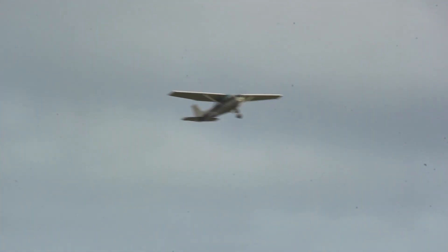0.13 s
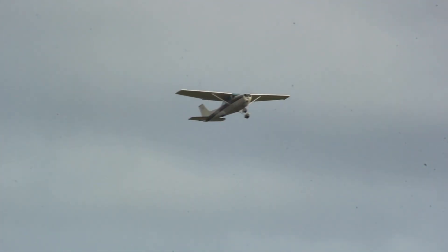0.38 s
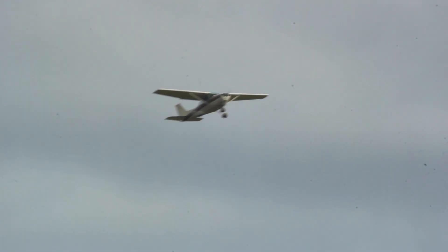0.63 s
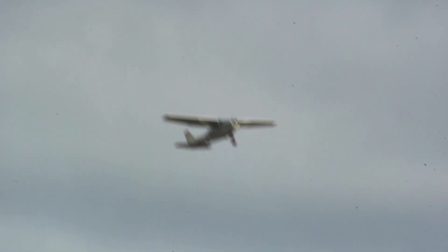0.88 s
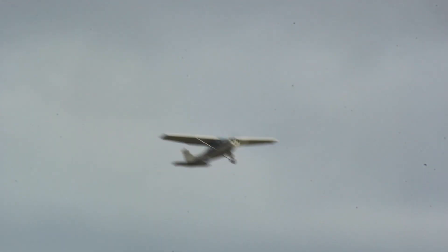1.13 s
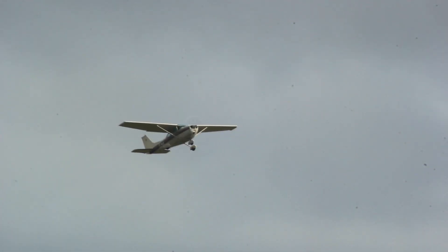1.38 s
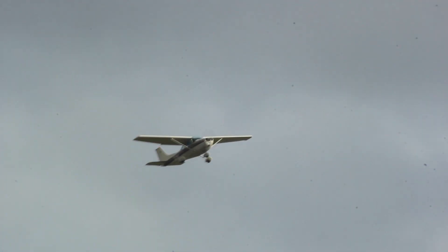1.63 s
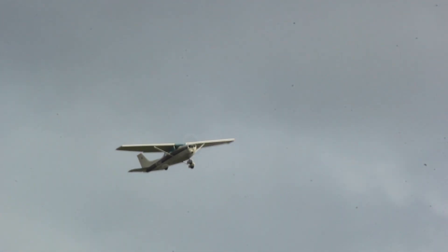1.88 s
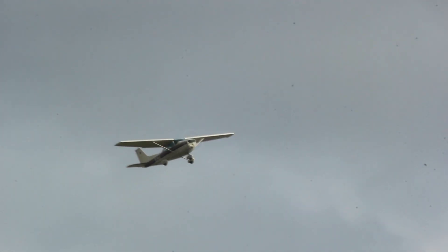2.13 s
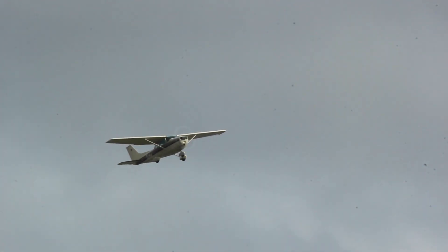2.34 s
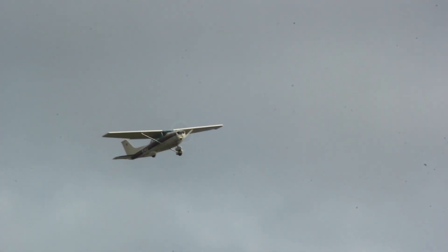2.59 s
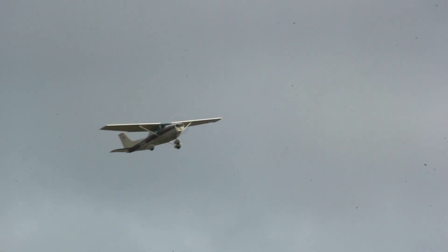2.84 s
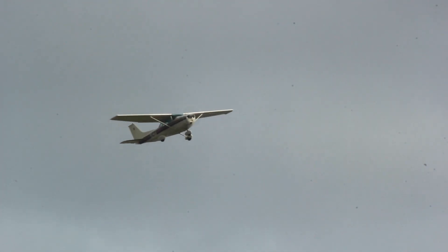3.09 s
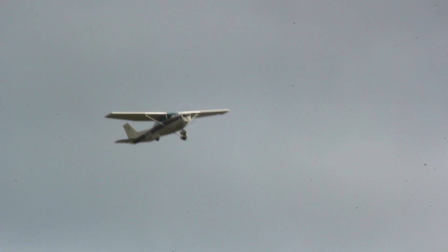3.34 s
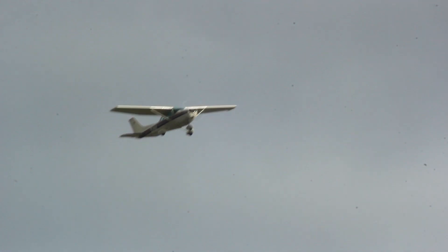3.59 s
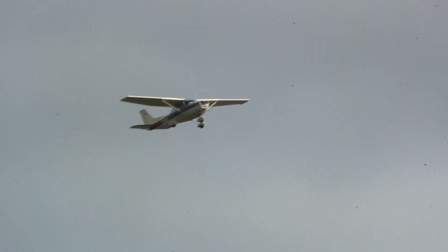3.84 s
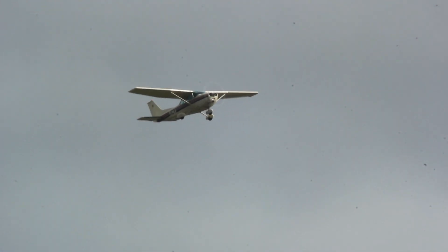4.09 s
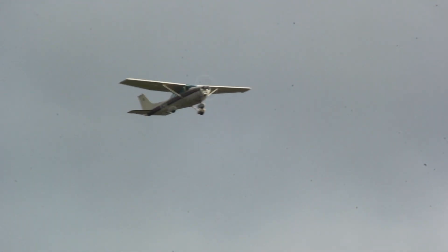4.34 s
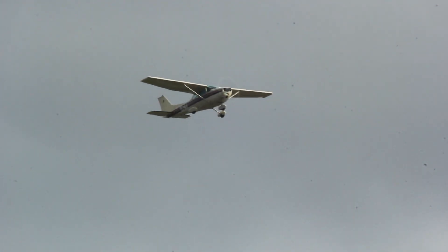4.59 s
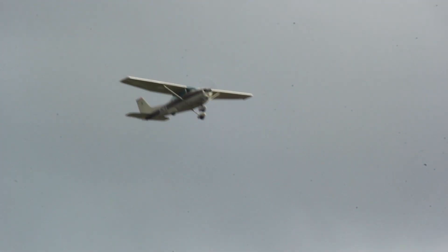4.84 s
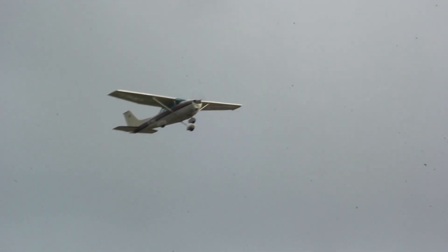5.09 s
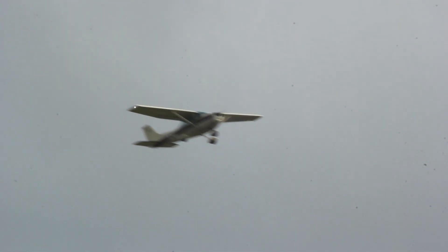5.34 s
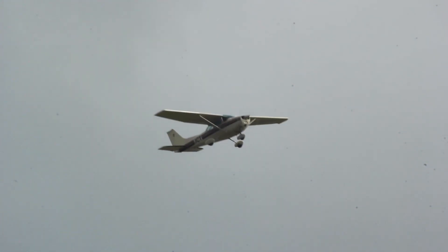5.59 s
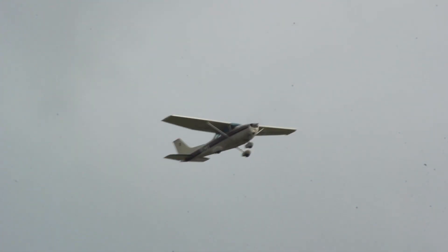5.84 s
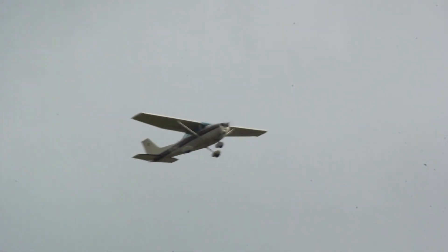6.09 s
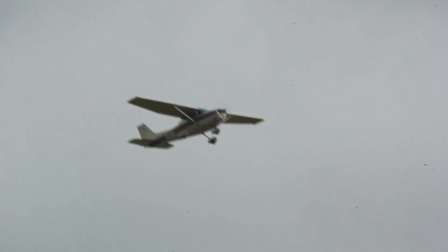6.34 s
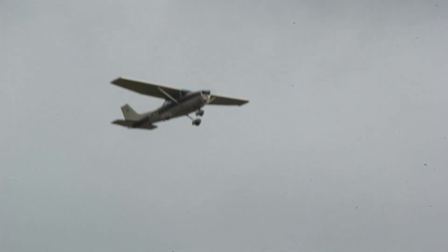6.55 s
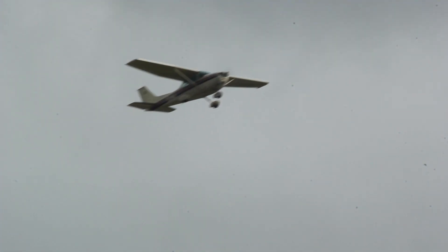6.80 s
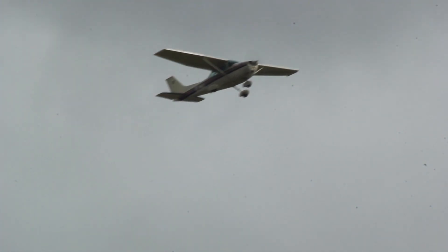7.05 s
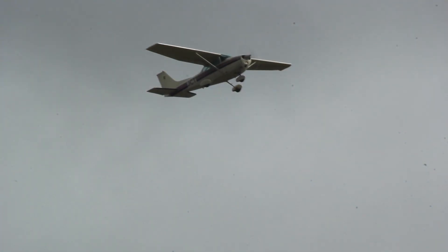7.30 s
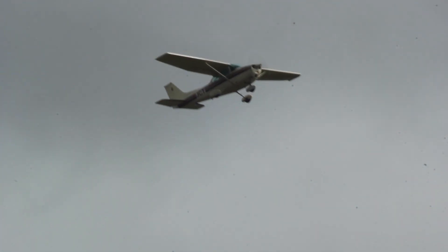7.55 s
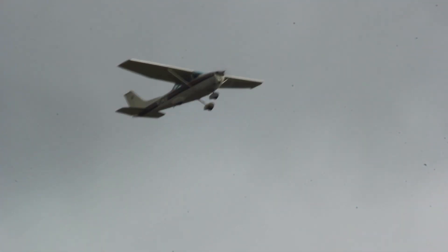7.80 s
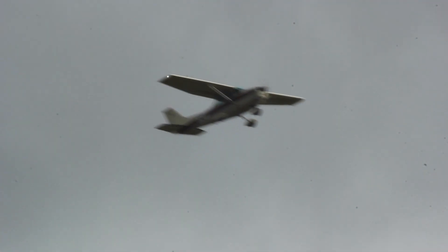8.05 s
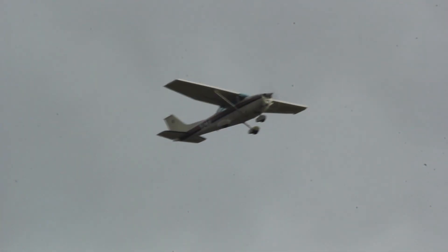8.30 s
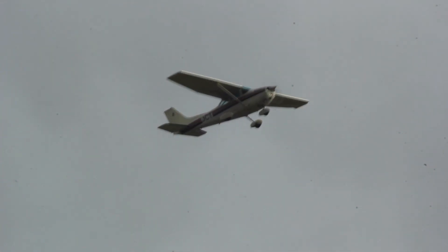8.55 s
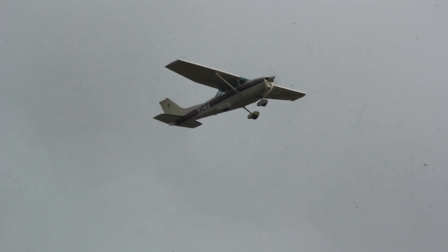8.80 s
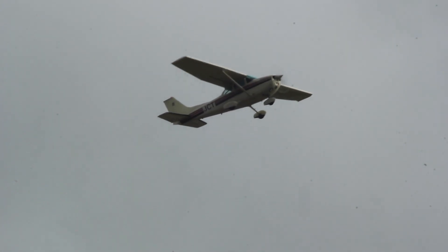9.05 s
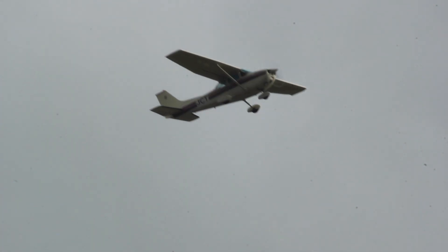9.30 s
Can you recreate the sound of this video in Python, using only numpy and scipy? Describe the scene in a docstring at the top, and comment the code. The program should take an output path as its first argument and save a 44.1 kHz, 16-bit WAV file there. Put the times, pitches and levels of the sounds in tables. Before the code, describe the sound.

A light propeller plane is already droning at the start and continues for about 9.4 seconds. Its low, nearly constant pitch, around 87 pulses per second, carries a throaty bark, gritty rasp and wavering propeller hum. The engine swells unevenly, with a strong, brighter surge near 3 seconds, weakens around 5.3 to 6.2, then returns in patches, including bursts near 8.7 and 9.1. Outdoor wind rumbles against the bare microphone throughout, with a dull rush in gusts. Short thumps come in the first five seconds; the heaviest, distorted blows hit around 5.2 to 5.7 and 7.2 to 7.9. Small dry ticks occur near 2.3, 3.0, 4.7 and later. Very faint, high descending bird peeps appear around 6.1 to 7.7 and 8.6 to 9. Thin hiss lies underneath; the drone and wind stop abruptly.

```python
"""Light propeller plane in strong wind

A four-cylinder engine drones: each firing passes a pulse of coloured noise and a short rattle.
The propeller adds sine tones locked to the firing rate, which waver in level and phase.
Wind is low noise that swells in gusts and thumps, with a brighter rush, driven into clipping.
A faint hiss lies beneath; damped rings make small ticks, and gliding sines a faint bird."""
import sys
import numpy as np
from scipy import signal
from scipy.io import wavfile
from scipy.ndimage import uniform_filter1d

SR = 44100
rng = np.random.default_rng(int(sys.argv[2]) if len(sys.argv) > 2 else 0)


def how_loud(loudness_db):
    """Turn decibels into a plain amplitude multiplier (0 dB gives 1, 20 dB gives 10)."""
    steps = np.asarray(loudness_db, float) / 20
    return 10 ** steps


def file_out(sig):
    """Save sig as 16-bit WAV at sys.argv[1]."""
    # one column per channel
    cols = np.atleast_2d(sig).T
    # limit, then scale
    lim = np.clip(cols, -1, 1)
    pcm = np.round(lim * 32767).astype(np.int16)
    wavfile.write(sys.argv[1], SR, pcm)


N = 415422  # samples
TIME = np.arange(N) / SR  # s
# Source levels are in dB ahead of the gain in record(); colour tables hold relative levels.


def evened(x):
    """Normalisation: scales a signal to unit rms."""
    return x / np.sqrt(np.mean(x ** 2) + 1e-20)


def columns(rows, t=TIME):
    """Linear interpolation: reads every column of a curve table at the times t."""
    s, *values = np.transpose(rows)
    return [np.interp(t, s, v) for v in values]


def add(mix, s, sound):
    """Superposition: adds a sound to the mix from s seconds on."""
    part = mix[round(s * SR):][:len(sound)]
    part += sound[:len(part)]


def drift(rate_hz):
    """Random-phase sum: twelve slow sines up to rate_hz make a chance curve of unit rms."""
    hz = np.geomspace(rate_hz / 15, rate_hz, num=12)[:, None]
    coarse = TIME[::256]
    waves = np.sin(2 * np.pi * (hz * coarse + rng.random((12, 1)))) / hz ** 0.38
    return np.interp(TIME, coarse, evened(waves.sum(0)))


def noise(colour, size, patchy_db, patch_hz, patch_s, shape_db=lambda t, hz: 0, beat=None, share=0):
    """Short-time spectral synthesis: random spectra shaped by a colour and by drifting loud patches."""
    hop = size // 4
    t = np.arange(N // hop + 5) * hop / SR
    hz = np.fft.rfftfreq(size, 1 / SR)[:, None]
    real, imaginary, patches = rng.standard_normal((len(t), len(hz), 3)).T
    for _ in range(2):
        patches = uniform_filter1d(patches, max(round(patch_hz * size / SR), 1), 0)
        patches = uniform_filter1d(patches, max(round(patch_s * SR / hop), 1), 1)
    colour_hz, colour_db = np.transpose(colour)
    field_db = np.interp(np.log(hz + 1), np.log(colour_hz + 1), colour_db, -120, -120)
    field_db = field_db + patchy_db * evened(patches) + shape_db(t, hz)
    field = how_loud(field_db)
    # even out the field's power over 0.1 s, so that the caller sets the level
    field = field / np.sqrt(uniform_filter1d((field ** 2).mean(0), max(round(0.1 * SR / hop), 1)))
    source = real + 1j * imaginary
    if beat is not None:  # a repeating beat passes through the same patches
        padded = np.pad(beat, (0, 2 * size))
        beat = signal.stft(padded, nperseg=size, noverlap=size - hop)[2][:, :len(t)]
        source = source + share * beat / np.sqrt(np.mean(abs(beat) ** 2))
    return evened(signal.istft(source * field, nperseg=size, noverlap=size - hop)[1][:N])


# Firing rate, which is also the blade rate: time_s [s], rate_hz [Hz]
FIRING_RATE = [(0, 88.05), (1.3, 87.75), (2, 87.3), (2.8, 87.05), (3.6, 87.0), (4.3, 87.4), (7, 87.42),
               (9.42, 87.3)]


def firings():
    """Phase is the integral of frequency: counts the firings since the start."""
    first_turn = -0.1  # parts of a firing
    return first_turn + np.cumsum(columns(FIRING_RATE)[0]) / SR


# Strength of the four cylinders in firing order: strength_db [dB]
CYLINDER_DB = [5.5, 4.9, 5, 0.5]
# Path through the air: time_s [s], scatter_db (filling of the gaps between puffs) [dB],
# early (early arrival) [parts of a firing]
AIR_PATH = [(0, 11, 0.0018), (1.0, 11, -0.0037), (1.5, 9, 0.07), (2.0, 10, 0.097), (2.6, 15, 0),
            (3.0, 7.5, -0.03), (3.5, 10, -0.25), (4.0, 13.5, -.3), (4.6, 14.5, -0.22), (5.2, 11, 0.033),
            (5.7, 18, 0.11), (6.5, 8.5, 0.075), (7.1, 12, .35), (7.7, 25, .2), (8.0, 7, 0.12),
            (8.4, 15, 0.057), (8.7, 2, 0.053), (9.1, 8.5, 0.087), (9.42, 15, 0.059)]


def cracks():
    """Impulse response: each firing excites a few milliseconds of rattle, slowly changing its pattern."""
    path_wander = 0.0787  # moving air shifts the arrival, rms in parts of a firing
    pattern_rate_hz = 1.2  # fastest change from one rattle pattern to another
    turns = firings() + columns(AIR_PATH)[1] + 0.1481 + path_wander * drift(6.0)
    # the running maximum keeps the count from stepping back
    fired = np.diff(np.floor(np.maximum.accumulate(turns)), prepend=0)
    fired = fired * how_loud(np.array(CYLINDER_DB)[turns.astype(int) % 4])
    rattles = rng.standard_normal((3, 300)) * np.exp(-np.arange(300) / 90.0)  # decay in samples
    shares = np.array([drift(pattern_rate_hz) for _ in rattles])
    shares = shares / np.linalg.norm(shares, axis=0)
    return evened(signal.oaconvolve(fired * shares, rattles, axes=1).sum(0)[:N])


# Exhaust after moving air: time_s [s], level_db (bark) [dB], rasp_db (against bark) [dB],
# fizz_db (against bark) [dB], centre_hz (band the air favours) [Hz]
EXHAUST = [(0.0, -33, -9, -27, 980), (.22, -29, -4, -26, 607), (0.44, -25, -5, -28.5, 1015),
           (.78, -30, -6, -27, 660), (0.92, -23, -10.5, -30, 578), (1.02, -28.5, -8, -29, 598),
           (1.2, -24, -9, -28, 750), (1.29, -24, -7.5, -30, 1310), (1.4, -27, -10, -28, 945),
           (1.66, -32.5, -4.5, -25, 917), (2.03, -23.5, -9, -28.5, 966), (2.3, -29, 0, -24, 873),
           (2.45, -25.5, -10.5, -30, 660), (2.62, -30, -6.5, -23.5, 724), (2.91, -25.5, -11.5, -27, 700),
           (3.03, -20.5, -9.5, -28, 1300), (3.085, -19, -14.5, -35, 960), (3.13, -24.5, -11, -29, 880),
           (3.23, -23, -10.5, -29.5, 780), (3.33, -31.5, -1.5, -20.5, 734), (3.49, -27, -11, -27, 1037),
           (3.65, -32, -6.5, -23.5, 678), (4.2, -24, -9, -27.5, 813), (4.35, -31, -7, -28, 737),
           (4.65, -28.5, -4.5, -22.5, 820), (4.95, -27.5, -9.5, -29, 894), (5.19, -30, -0.5, -18.5, 920),
           (5.33, -36, -3, -24, 787), (5.6, -38, -7.5, -24, 700), (5.75, -41.5, -11.5, -23.5, 647),
           (6.15, -36, -5, -19.5, 700), (6.3, -30, -12.5, -24.5, 747), (6.56, -29.5, -3, -19, 650),
           (6.85, -30.5, -5, -20.5, 870), (7.26, -27.5, -6, -23, 804), (7.55, -34, -9, -21.5, 640),
           (7.9, -35.5, -6.5, -20.5, 737), (8.04, -27, -8.5, -26, 784), (8.3, -39, -4, -15.5, 680),
           (8.53, -34, -6, -20, 667), (8.62, -27, -8, -21, 810), (8.7, -26.5, -0.5, -22, 956),
           (8.74, -28.5, -9, -14, 800), (8.765, -32, -9, -26, 750), (8.81, -35, -11, -20, 697),
           (9.02, -33, -11.5, -24.5, 615), (9.13, -27.5, -9.5, -23.5, 824), (9.42, -35, -5, -19, 644)]
# Low part of a puff: pitch_hz [Hz], level_db [dB]
BARK_COLOUR = [(120, -10), (200, -7), (291, -24.5), (345, -5.5), (480, -10), (700, -13), (950, -13),
               (1700, -18), (2210, -25), (3740, -120)]
# Middle part of a puff: pitch_hz [Hz], level_db [dB]
RASP_COLOUR = [(900, -25.5), (1250, -8), (1500, -7.5), (1800, -19), (2200, -10.5), (2600, -15), (2900, -17),
               (3250, -16), (3550, -19.5), (3800, -25), (4200, -37), (5000, -43)]
# Top part of a puff: pitch_hz [Hz], level_db [dB]
FIZZ_COLOUR = [(3000, 0.5), (3900, 0.5), (4400, 0.5), (5600, 0.5), (6100, -4), (6600, -11.5), (8300, -14),
               (9500, -27), (12000, -35)]
# Changing brightness of the rasp, pivoting near 2 kHz: time_s [s], tilt_db [dB per octave]
RASP_TILT = [(0, -4.5), (.8, 0), (1.3, 3.5), (2.4, 0), (3, 5.5), (4.5, 0), (5.2, 2), (5.6, -9), (6.1, 2.5),
             (7.5, 2.5), (8.6, 1), (9.42, 5.5)]


def exhaust():
    """Amplitude modulation: each firing gates noise into a puff; cylinders differ, no two puffs match."""
    puff_spread_db = 2.8  # chance from puff to puff, rms
    focus = 0.041  # loud moments deepen the favoured band, share per dB
    level_db, rasp_db, fizz_db, _ = columns(EXHAUST)
    scatter_db, early = columns(AIR_PATH)
    turns = firings() + early + 1.5
    count = turns.astype(int)
    puff = abs(np.sin(np.pi * turns)) ** 1.2 * how_loud(np.array(CYLINDER_DB)[count % 4])
    blur = how_loud(scatter_db)

    def favoured(t, hz):
        """Band emphasis: a bell on a logarithmic frequency scale, deeper when loud."""
        loud_db, *_, centre_hz = columns(EXHAUST, t)
        bell = np.exp(-(np.log((hz + 1) / centre_hz) / 0.36) ** 2)
        return 6.5 * (1 + focus * (loud_db + 26.5)) * bell

    def tilted(t, hz):
        """Spectral tilt: a straight slope per octave about 2 kHz."""
        return columns(RASP_TILT, t)[0] * np.log2((hz + 1) / 2000)

    def pulsed(sound, fill):
        """Gating: puffs stand on a floor of scattered sound, at an even mean power."""
        chance = how_loud(puff_spread_db * rng.standard_normal(N // 400)[count])
        gate = fill * blur + puff * chance
        return sound * gate / np.sqrt(uniform_filter1d(gate ** 2, size=8000))

    rattle = cracks() / blur ** 0.56  # scattering breaks up the repeats
    bark = noise(BARK_COLOUR, size=1024, patchy_db=2.5, patch_hz=150.3, patch_s=0.06,
                 shape_db=favoured, beat=rattle, share=0.29)
    rasp = noise(RASP_COLOUR, size=512, patchy_db=3.0, patch_hz=250, patch_s=0.036,
                 shape_db=tilted, beat=rattle, share=0.19)
    fizz = noise(FIZZ_COLOUR, size=256, patchy_db=3.0, patch_hz=597, patch_s=0.02,
                 beat=rattle, share=0.21)
    puffs = pulsed(bark, 0.39)
    puffs = puffs + how_loud(rasp_db) * pulsed(rasp, 0.54)
    puffs = puffs + how_loud(fizz_db) * pulsed(fizz, 0.38)
    return how_loud(level_db) * puffs


# Strongest tones, by multiple of the firing rate, rms before chance sway: time_s [s],
# 1st_db, 3rd_db, 4th_db, 6th_db, 7th_db, 8th_db [dB]
STRONG_TONES = [(0.05, -59, -59, -55, -34.5, -40.5, -57), (0.3, -23, -43, -35.5, -33.5, -44, -61),
                (0.6, -20.5, -42, -32.5, -49, -49, -57), (0.9, -19, -60, -38.5, -34, -36, -54),
                (1.15, -21, -52, -28, -31, -37, -29), (1.45, -23, -52, -45, -44, -55, -61),
                (1.8, -25.5, -67, -42, -60, -53.0, -51), (2.2, -21, -34.5, -37, -46, -36, -41),
                (2.6, -22, -36.5, -38, -53, -43, -59), (3.0, -26.5, -31, -26.5, -42, -59, -50),
                (3.3, -26.5, -35.5, -35, -54.0, -49, -42), (3.7, -26, -42.5, -58, -41, -48, -40.5),
                (4.2, -25.5, -41.5, -45, -45, -58, -41), (4.6, -27.5, -32.5, -38.5, -64, -57, -42),
                (5.0, -58, -36.5, -41, -64, -61, -38), (5.4, -25, -46.5, -58, -57, -60, -44.5),
                (5.8, -43, -54, -55.0, -59, -47.5, -49), (6.2, -41, -41, -45, -57, -46, -41),
                (6.5, -26, -32.5, -40.0, -55, -31.5, -46), (6.85, -27.5, -38.5, -51, -57, -38.5, -39),
                (7.2, -26.5, -35, -35, -45, -37, -34.5), (7.6, -60, -41, -60, -59, -44, -47.5),
                (8.1, -59, -53, -52, -58, -35, -35), (8.4, -55, -40, -37, -52, -43, -56),
                (8.7, -50, -57, -50, -53, -28, -49), (8.84, -33, -55, -48, -54, -41, -49),
                (9.0, -28, -39, -50, -40, -34, -39), (9.35, -60, -51, -40.5, -46, -43, -53)]
# Weaker tones: multiple [firing rates], level_db (against the smoothed exhaust level) [dB]
FAINT_TONES = [(2, -18), (5, -17), (10.5, -17.5), (11, -22), (12, -17.5)]


def propeller():
    """Additive synthesis: tones locked to the blade rate, wavering in level and phase through eddies."""
    flutter = 0.32  # small eddies blur the phase, rms radians at the first multiple
    sway_db = 1.2  # chance in level, rms at the first multiple
    angle = 2 * np.pi * firings()
    strong = zip((1, 3, 4, 6, 7, 8), columns(STRONG_TONES))
    exhaust_db = uniform_filter1d(columns(EXHAUST)[0], size=4000)
    faint = [(multiple, db + exhaust_db) for multiple, db in FAINT_TONES]
    out = np.zeros(N)
    for multiple, db in [*strong, *faint]:
        waver = 0.18 * multiple * drift(9.0) + flutter * np.sqrt(multiple) * drift(40)
        waver = waver + 2 * np.pi * rng.random()
        level_db = db + sway_db * np.sqrt(multiple) * drift(15)
        out += np.sqrt(2) * how_loud(level_db) * np.sin(multiple * angle + waver)
    return out


# Wind on the microphone between thumps: time_s [s], buffet_db [dB], rush_db [dB]
GUSTS = [(0, -17, -30.5), (.55, -18.5, -31), (1.0, -16, -23.5), (1.5, -17, -29), (1.76, -21.5, -29),
         (2.0, -17, -35.5), (2.2, -19, -32.5), (2.8, -12.5, -24.5), (3.1, -20.5, -34.5), (3.6, -12.5, -24),
         (3.7, -15.5, -22.5), (3.8, -20.5, -25), (4.25, -11.5, -23), (4.5, -19, -26), (5.0, -12.5, -24.5),
         (5.3, -17, -24.5), (5.6, -15.5, -30), (5.9, -24, -33.5), (6.5, -18.5, -25.5), (7.0, -16.5, -27.5),
         (7.6, -18, -26), (8.0, -11.5, -27.5), (8.37, -18, -24), (8.85, -17.5, -28), (9.42, -18, -25.5)]
# Single eddies, added to the buffet as power: centre_s [s], level_db (peak of the power) [dB],
# length_s (full width at 1/e of the power) [s]
THUMPS = [(0.077, -10, 0.022), (1.376, -12, 0.072), (1.586, -10, 0.071), (1.857, -10, 0.06),
          (2.104, -9, 0.026), (2.885, -8.5, 0.025), (3.032, -11.5, 0.034), (4.338, -7.5, 0.036),
          (4.68, -11.5, 0.12), (5.087, -13.5, 0.018), (5.184, -6, 0.049), (5.351, -1.5, 0.031),
          (5.415, -7.5, 0.034), (5.471, 0, 0.013), (5.655, -5, 0.026), (5.688, -5.5, 0.06),
          (5.809, -14, 0.049), (5.959, -12.5, 0.051), (6.035, -9, 0.014), (6.145, -14, 0.074),
          (6.27, -13.5, 0.041), (6.694, -13, 0.073), (7.057, -10.5, 0.049), (7.216, -6.5, 0.027),
          (7.312, -2.5, 0.029), (7.464, -5, 0.032), (7.529, -9.5, 0.037), (7.648, -11, 0.078),
          (7.731, -10.5, 0.05), (7.924, -3, 0.022), (8.56, -13.5, .2), (8.964, -14.5, 0.089),
          (9.154, -9.5, 0.079), (9.356, -14, 0.065)]
# Low noise of the eddies: pitch_hz [Hz], level_db [dB]
BUFFET_COLOUR = [(3, -9.5), (15, -1.5), (30, 1), (55, -2), (80, -6.5), (130, -20), (200, -45)]
# Brighter noise above the eddies: pitch_hz [Hz], level_db [dB]
RUSH_COLOUR = [(90, -23), (130, 0.5), (200, -3), (330, -13.5), (600, -24.5), (1500, -34), (4000, -43.5)]


def wind():
    """Turbulent pressure noise: eddies thump the microphone, and a brighter rush rides on them."""
    quicken = 0.18  # stronger eddies pass faster: dB per octave of tilt for each dB of strength
    rush_follows = 0.6  # power of a thump's rise in amplitude that the rush takes along
    buffet_db, rush_db = columns(GUSTS)
    power = how_loud(buffet_db) ** 2
    for s, db, length in THUMPS:
        power = power + how_loud(db) ** 2 * np.exp(-(2 * (TIME - s) / length) ** 2)
    strength_db = 10 * np.log10(uniform_filter1d(power, size=4000))

    def tilt(t, hz):
        """Frozen turbulence: faster eddies sound higher, so strength tilts the spectrum upward."""
        return quicken * (np.interp(t, TIME, strength_db) + 14.0) * np.log2(np.clip(hz, 10, 200) / 45)

    eddies = noise(BUFFET_COLOUR, size=4096, patchy_db=2.0, patch_hz=25, patch_s=0.06, shape_db=tilt)
    # the gust sets the strength, so slow chance swings of the eddies are evened out
    swings = uniform_filter1d(uniform_filter1d(eddies ** 2, size=2000), size=2000)
    eddies = eddies / (swings + 0.01) ** 0.36
    rush = noise(RUSH_COLOUR, size=1024, patchy_db=2.0, patch_hz=90, patch_s=0.03)
    rise = np.sqrt(power) / how_loud(buffet_db)
    return np.sqrt(power) * evened(eddies) + how_loud(rush_db) * rise ** rush_follows * rush


# Thin hiss of varying level: time_s [s], level_db [dB]
HISS = [(0.0, -65.5), (0.97, -59), (1.3, -61), (1.4, -65.5), (1.85, -63), (2.46, -61.5), (3.15, -67),
        (3.83, -63), (4.07, -60), (5.11, -62.5), (5.43, -69), (5.82, -71), (6.69, -63.5), (7.03, -60),
        (7.5, -62.5), (8.2, -69.5), (8.3, -62.5), (8.84, -67), (9.42, -63.5)]
# Colour of the hiss: pitch_hz [Hz], level_db [dB]
HISS_COLOUR = [(4000, -3), (7000, 0), (10000, -5.5), (16000, -6)]


def hiss():
    """Stationary random noise: a smooth treble band under a slow level curve."""
    return how_loud(columns(HISS)[0]) * noise(HISS_COLOUR, size=512, patchy_db=2.0, patch_hz=1530, patch_s=0.05)


# Small ticks close to the microphone: start_s [s], level_db (peak) [dB], pitch_hz [Hz],
# width_hz (bandwidth) [Hz]
TICKS = [(1.1268, -57, 7480, 1500), (2.255, -34, 6500, 5500), (3.037, -26, 6560, 7000),
         (4.706, -32.5, 6650, 5500), (5.248, -41, 7840, 900), (5.683, -37, 9000, 7000),
         (8.6226, -34.5, 6510, 6000), (8.947, -42, 8150, 6000), (9.375, -48, 7200, 3500)]


def ticks():
    """Damped resonance: a very short ring decays faster the wider its band."""
    out, t = np.zeros(N), np.arange(0, 0.004, 1 / SR)
    for s, db, hz, width in TICKS:
        ring = np.exp(-np.pi * width * t) * np.cos(2 * np.pi * hz * t)
        add(out, s, how_loud(db) * ring)
    return out


# Bird notes: start_s [s], level_db (peak) [dB], base_hz (the glide runs from 70 above to 230 below) [Hz]
PEEPS = [(6.145, -67, 7920), (6.484, -61, 8030), (6.604, -55, 8050), (6.709, -59, 8060), (6.821, -53, 8050),
         (7.39, -64, 7850), (7.495, -58, 8000), (7.612, -64, 8050), (7.728, -58, 8100), (8.63, -65, 8050),
         (8.735, -63, 8030), (8.844, -63, 8110), (8.959, -60, 8100)]


def bird():
    """Frequency modulation: short thin sine notes whose pitch slides down most steeply at the end."""
    out, t = np.zeros(N), np.arange(0, 0.022, 1 / SR)
    envelope = signal.windows.tukey(len(t), 0.35)
    for s, db, hz in PEEPS:
        pitch_hz = hz + 70 - 300 * (t / t[-1]) ** 2.5
        add(out, s, how_loud(db) * envelope * np.sin(2 * np.pi * np.cumsum(pitch_hz) / SR))
    return out


def scene():
    """Linear superposition: the sources sum into one channel."""
    return (exhaust() + propeller() + wind() + hiss() + ticks() + bird())[None]


def top_cut(x):
    """Nothing passes above the cut-off."""
    return signal.sosfilt(signal.butter(12, 15790, fs=SR, output="sos"), x)


def record(dry):
    """Saturation: the strongest gusts bend over a knee into full scale and clip."""
    bent = 1.08 * dry / (1 + abs(dry) ** 9) ** (1 / 9)
    bent = bent * np.minimum((N - np.arange(N)) / 100, 1)  # soft ending over 100 samples
    return top_cut(np.clip(bent, -1, 1))


dry = scene()
out = record(dry)
file_out(out)
```